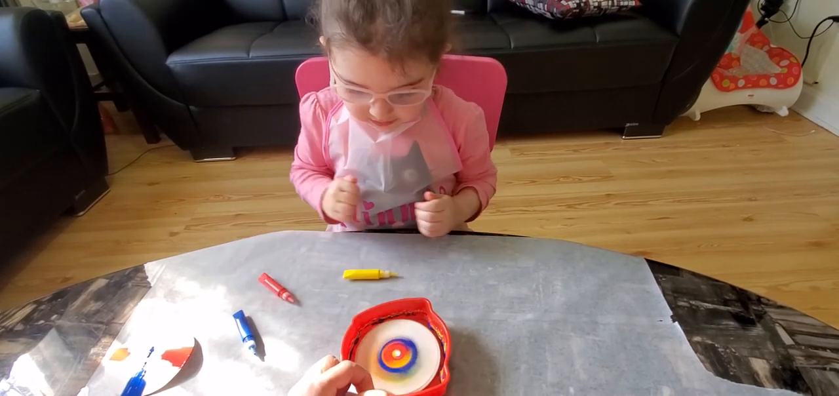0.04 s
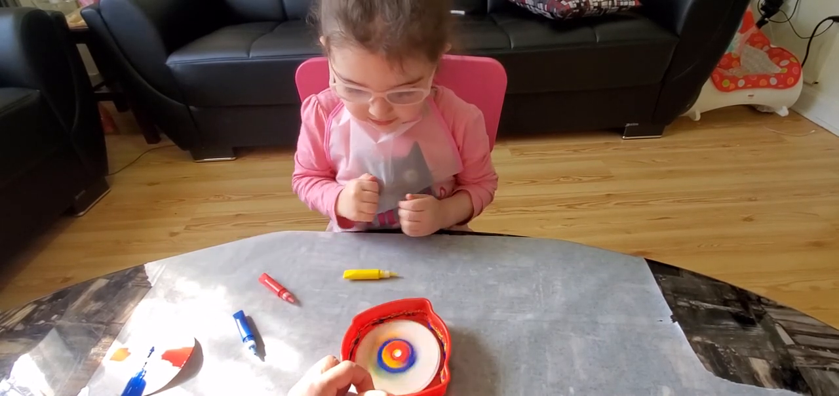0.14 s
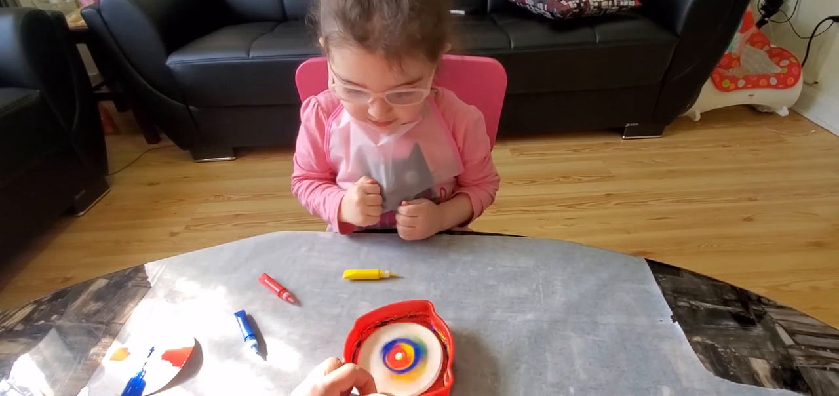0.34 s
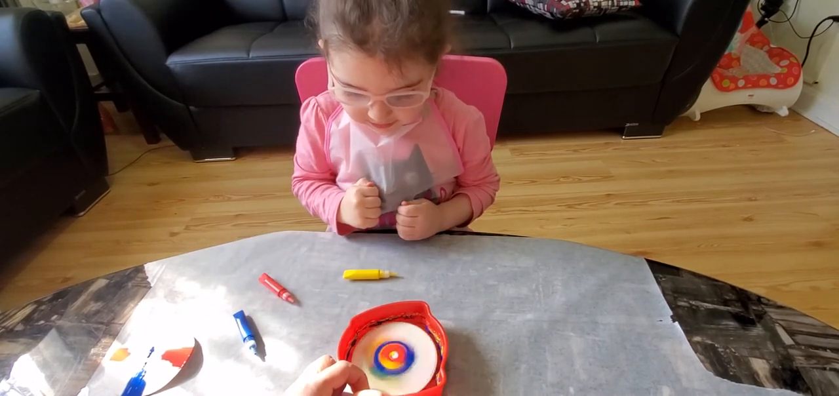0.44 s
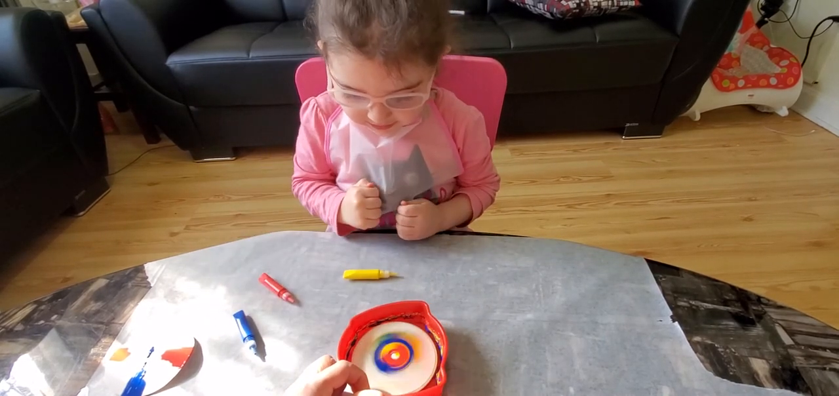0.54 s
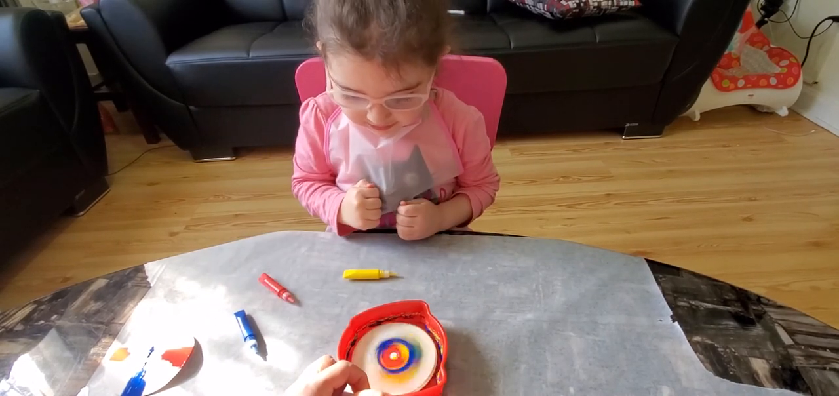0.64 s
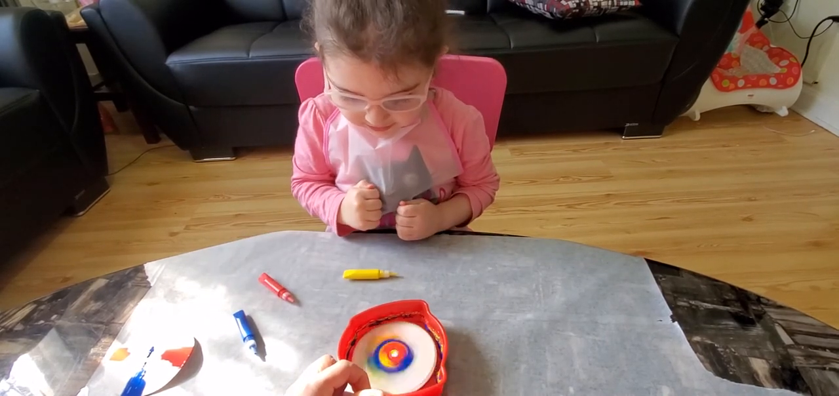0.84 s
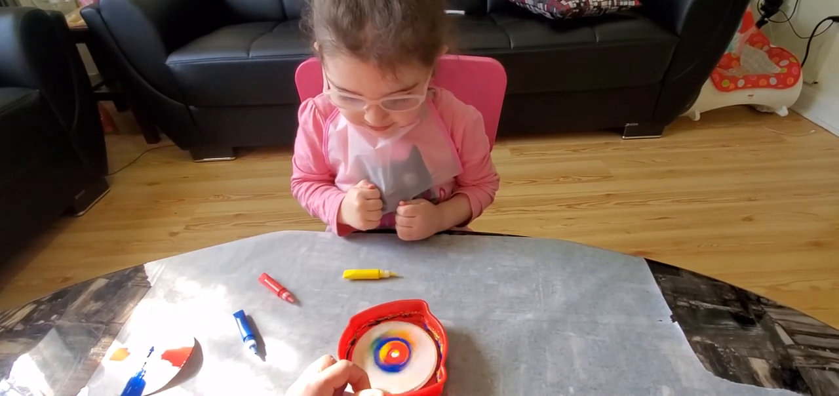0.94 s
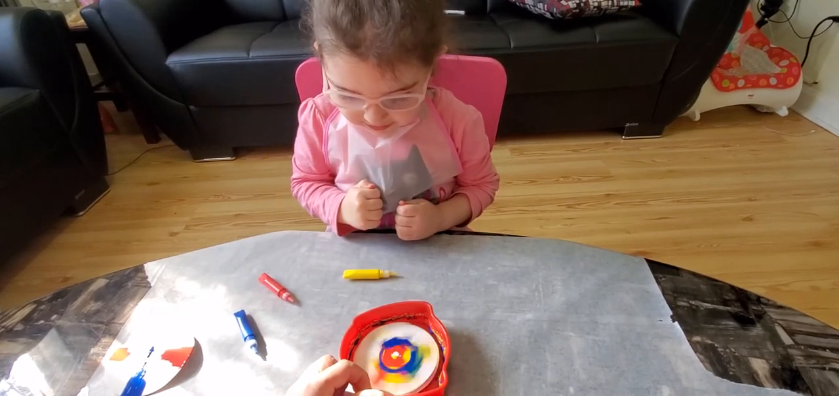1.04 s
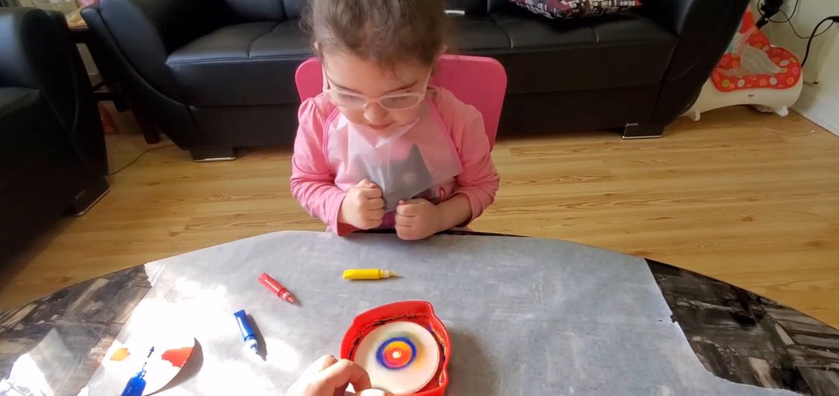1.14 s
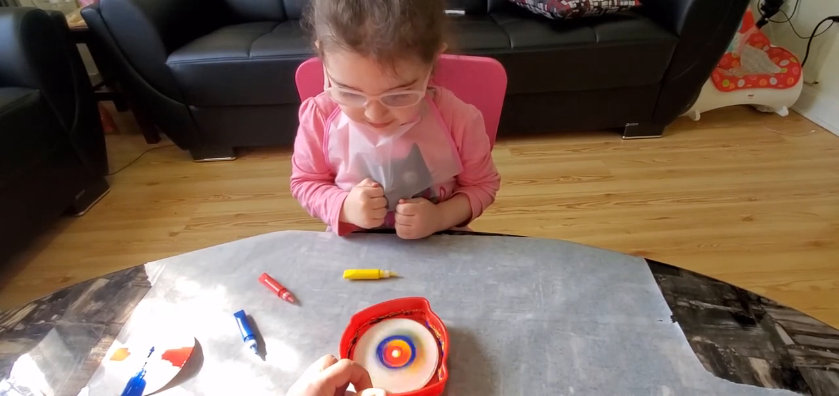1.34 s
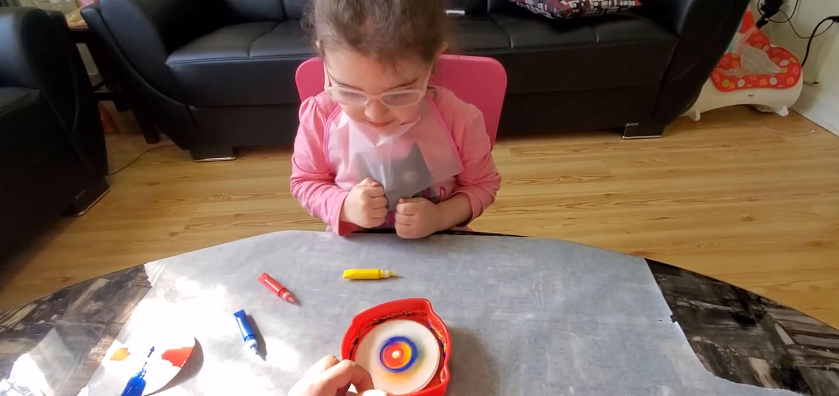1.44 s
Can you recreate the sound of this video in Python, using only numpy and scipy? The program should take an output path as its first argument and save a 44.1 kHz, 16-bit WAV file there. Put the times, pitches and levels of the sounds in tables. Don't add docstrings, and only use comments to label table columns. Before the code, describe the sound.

Close up indoors, hard plastic teeth rattle in a quick burst and snap back, pause with faint whirring and ticking, then rattle again more softly; low table thumps and short room ring accompany each push.

```python
import sys
import numpy as np
from scipy import signal
from scipy.fft import rfft, irfft, next_fast_len
from scipy.io import wavfile
from scipy.ndimage import uniform_filter1d, map_coordinates

SR = 44100
rng = np.random.default_rng(int(sys.argv[2]) if len(sys.argv) > 2 else 0)


def how_loud(loudness_db):
    steps = np.asarray(loudness_db, float) / 20
    return 10 ** steps


def dump(signal):
    limited = np.clip(np.atleast_2d(signal).T, -1, 1)
    pcm = np.round(limited * 32767).astype(np.int16)
    wavfile.write(sys.argv[1], SR, pcm)


N = 66150

# pitch_hz, level_db
ROOM_TONE_COLOUR = [(15, -39), (30, 13), (80, 3.5), (796, -36), (1940, -29), (2910, -24.5), (4610, -6),
                    (10100, -30.5), (15000, -9)]
# time_s, level_db
WHIR_LEVEL = [(0, -54.5), (.18, -55.5), (.55, -61.5), (.66, -51.5), (0.761, -53.5), (.83, -72),
              (0.92, -40.5), (1.25, -57.5), (1.5, -51)]
# pitch_hz, level_db
BEARING_COLOUR = [(180, -52), (300, -20), (624, -2), (900, -4.5), (1900, -4.5), (2840, -10.5),
                  (7820, -12.5), (9090, -25), (16000, -31)]
# pitch_hz, level_db, t60_s
DISC_MODES = [(810, -0.5, 0.11), (1239, 3, 0.026), (1628, 1, 0.04), (1830, -6, .08), (2270, 2, 0.024),
              (3260, -8.5, 0.0037)]
# start_s, peak_db, brightness_db, contact_hz
DISC_TICKS = [(.0044, -36.5, -9, 1950), (.0163, -33, 4, 1870), (.044, -48, -7, 1900), (.0945, -41, 2, 1980),
              (.1132, -35.5, 8, 2670), (.183, -35.5, -9, 2000), (.6247, -42, -27, 1980),
              (.6344, -50, -10, 5500), (.6443, -41, -2, 2280), (.6575, -29.5, -19, 1880),
              (.6688, -32.5, -7, 1970), (.7037, -56, 0, 5500), (.7133, -32.5, -1, 5940),
              (.7244, -28.5, -16, 2100), (.7387, -28.5, -7, 1970), (.8457, -45, -13, 1910),
              (.860, -45, -7, 3500), (.8696, -35.5, -13, 1200), (.9107, -19, -13, 3560),
              (1.2530, -45, -17, 1270), (1.2890, -35, -1, 1520), (1.3135, -32, -5, 1180),
              (1.324, -44, -9, 1200), (1.336, -44, -9, 1100), (1.3630, -32, -6, 1230),
              (1.3919, -39, -3, 1500), (1.4085, -34, -5, 1300), (1.458, -36, -6, 1650),
              (1.4806, -31.5, -8, 1450)]
# start_s, peak_db, brightness_db, contact_hz
TOOTH_CLICKS = [(.2043, -2, -1, 1750), (.2075, -10, -2, 2900), (.2115, -6, 1, 4000), (.2152, -4, 0, 1800),
                (.2196, -4, -1, 3000), (.2242, -2, 1, 1950), (.2297, -4, 1, 5700), (.2352, -4, -2, 1850),
                (.2417, -5, -3, 1850), (.2514, -6, 1, 4800), (.2530, -6, -5, 2000), (.2664, -4, 1, 1800),
                (.2686, -7, -6, 1200), (.9416, -7, -1, 3300), (.9430, -10, -5, 1700), (.9470, -15, 3, 5600),
                (.9524, -9, -1, 5600), (.9584, -7, 0, 5700), (.9655, -8, 2, 2200), (.9739, -6, -6, 1850),
                (.9833, -8, -10, 1800), (.9988, -5, -7, 1800), (1.0008, -11, -13, 1800),
                (1.0098, -16, -9, 2000)]
# start_s, peak_db, brightness_db, contact_hz
RETURN_JOLTS = [(.3327, -5, 1, 3100), (.3346, -7, 1, 5500), (.3363, -3, 1, 3400), (.3385, -8, 2, 1700),
                (.3400, -7, 2, 5300), (.3422, -7, 0, 1650), (.3443, -9, 0, 2600), (.3468, -5, 2, 3700),
                (.3492, -9, 0, 1700), (.3508, -7, 3, 3900), (.3558, -14, 0, 2100), (.3660, -16, -2, 3200),
                (.3690, -15, -2, 3000), (1.0853, -25, -9, 1900), (1.0908, -25, -9, 1800),
                (1.0945, -23, -9, 2000), (1.1035, -23, -9, 2100), (1.1092, -8, -5, 1650),
                (1.1125, -21, -12, 1300), (1.1197, -18, -15, 1900), (1.128, -23, -12, 1300),
                (1.1418, -9, -3, 2000), (1.1434, -10, 0, 3200), (1.1452, -10, 0, 3000),
                (1.1470, -14, 0, 2500), (1.1495, -15, -9, 1400)]
# pitch_hz, level_db, t60_s
SHELL_MODES = [(736, -16, 0.018), (956, -17.5, 0.033), (1195, -5.5, 0.028), (1670, -9, 0.014),
               (1827, -0.5, 0.013), (1905, -3.5, 0.041), (2541, -6.5, 0.064), (2857, -1.5, 0.028),
               (3480, 5, 0.0095), (4240, -3, 0.027), (5750, -8, 0.024), (6716, -5.5, 0.023),
               (7750, 0, 0.0029)]
# pitch_hz, level_db (per Hz)
PLASTIC_COLOUR = [(180, -30), (300, -29.5), (915, -24), (1190, -13.5), (1840, -9.5), (2210, -9.5),
                  (5610, -9.5), (8790, -21), (16000, -27.5)]
# start_s, rise_s, hold_s, level_db, brightness_db
RACK_SCRAPES = [
    (0.196, 0.005, 0.004, -40, -9),
    (0.2040, 0.001, 0.022, -26, 2),
    (.3322, 0.001, 0.019, -23, 4),
    (0.352, 0.002, 0.02, -27, 1),
    (0.87, 0.04, 0.03, -34, -8),
    (1.07, 0.022, 0.045, -30, -15),
    (1.141, 0.0018, 0.0051, -24, 0),
    (0.255, 0.0093, 0.057, -33, -6),
]
# start_s, level_db, rise_s, pitch_hz
LOW_THUMPS = [(0.198, -52, 0.014, 72), (.21, -36, 0.03, 172), (.335, -48, 0.012, 130),
              (0.365, -50, 0.012, 54), (.39, -33, 0.018, 166), (.44, -48, .02, 430), (.89, -38, .02, 147),
              (.94, -51, 0.0092, 66), (0.945, -34, 0.012, 160), (.95, -43, .01, 465),
              (0.955, -38, 0.012, 327), (1.0, -41, .02, 355), (.985, -44, .01, 250),
              (1.09, -46, 0.0084, 500), (1.1, -45, .012, 250), (1.13, -46, 0.016, 430),
              (1.14, -49, .01, 70), (1.144, -36, 0.004, 161), (1.26, -50, .02, 355)]
# pitch_hz, level_db (per Hz)
TABLE_COLOUR = [(60, -16.5), (110, -30), (150, -2.5), (180, -2), (240, -9.5), (340, -10), (500, -10),
                (900, -41)]
# pitch_hz, t60_s
ROOM_DECAY = [(200, 0.89), (1000, 0.41), (3000, 0.44), (8000, 0.32), (14000, 0.33)]
# pitch_hz, left_over_right_db
STEREO_LEAN = [(300, -3.5), (1000, 2), (2100, 5), (3000, -2.5), (6500, -1.5), (8300, 9), (9700, -1),
               (15500, 11)]
# pitch_hz, left_lead_rad
STEREO_LEAD = [(250, 0), (800, 1.4), (3500, 1.6), (5000, 2.8)]
# pitch_hz, likeness_0_to_1
STEREO_LIKENESS = [(3000, .95), (4500, .6), (7000, .2), (15000, .1)]


def unit(x):
    return x / np.sqrt(np.mean(x ** 2) + 1e-20)


def along(points, hz):
    f, value = np.transpose(points)
    return np.interp(np.log(hz + 1), np.log(f + 1), value)


def filtered(x, response):
    size = next_fast_len(x.shape[-1] + 8192)
    spectrum = rfft(x, size) * response(np.fft.rfftfreq(size, 1 / SR))
    return irfft(spectrum, size)[..., :x.shape[-1]]


def causal(points):
    gain = how_loud(along(points, np.fft.rfftfreq(2048, 1 / SR)))
    cepstrum = irfft(np.log(gain + 1e-6))
    cepstrum[1:1024] *= 2
    cepstrum[1025:] = 0
    h = irfft(np.exp(rfft(cepstrum)))[:1024]
    return h / np.linalg.norm(h)


def tilt(x, bright_db):
    treble = signal.lfilter(*signal.butter(1, 2400, "high", fs=SR), x)
    x = x + (how_loud(np.clip(bright_db, -15, 7)) - 1) * treble
    return signal.lfilter(*signal.butter(3, 750, "high", fs=SR), x)


def room_tone():
    mid, side = filtered(rng.standard_normal((2, N)), lambda hz: how_loud(along(ROOM_TONE_COLOUR, hz)))
    side = filtered(side, lambda hz: 0.45 + 0.55 * hz ** 2 / (hz ** 2 + 450 ** 2))
    return how_loud(-64) * np.array([mid + side, mid - side]) / np.std(mid)


def grit(colour, body, ring_db):
    grains_per_s, scatter_db, cap_db, grain_t60_s = 1500, 3, 8, .003
    size = how_loud(np.minimum(scatter_db * rng.exponential(1, N), cap_db))
    size = size * (rng.random(N) < grains_per_s / SR)
    t = np.arange(200) / SR
    grains = np.convolve(size, how_loud(-60 * t / grain_t60_s))[:N] * rng.standard_normal(N)
    grains = unit(grains) + .4 * rng.standard_normal(N)

    def response(f):
        modes = 0
        for hz, db, t60 in body:
            width = 2.2 / t60
            modes = modes + how_loud(db) * 1j * f * width / (hz * hz - f * f + 1j * f * width)
        return 1 + how_loud(ring_db) * modes

    return unit(filtered(np.convolve(grains, causal(colour))[:N], response))


def whir():
    s, db = np.transpose(WHIR_LEVEL)
    t = np.arange(N) / SR
    flutter_db = 2 * map_coordinates(rng.standard_normal(200), [t * 70])
    return how_loud(np.interp(t, s, db) + flutter_db) * tilt(grit(BEARING_COLOUR, DISC_MODES, ring_db=6), 0)


def clicks(rows):
    crack_db, crack_t60_s, contact_s = 11.5, .009, .0003
    mode_scatter_db, detune = 2.5, .012
    favour_db, favour_cycles = 0, 17
    out = np.zeros(N + SR)
    t = np.arange(SR // 20) / SR
    colour = causal(PLASTIC_COLOUR)
    hz, db, t60 = np.transpose(SHELL_MODES)[:, :, None]
    t60 = .85 * np.clip(t60, .008, .035)
    onset = (1 - np.exp(-t / contact_s)) ** 2
    for s, peak_db, bright_db, own_hz in rows:
        level_g, pitch_g = rng.standard_normal((2,) + hz.shape)
        phase = rng.random(hz.shape)
        mode_level = how_loud(db + mode_scatter_db * level_g - 60 * t / t60)
        ring = (mode_level * np.sin(2 * np.pi * (hz * (1 + detune * pitch_g) * t + phase))).sum(0)
        noise = rng.standard_normal(len(t)) * how_loud(crack_db - 60 * t / crack_t60_s)
        crack = np.convolve(noise, colour)[:len(t)]
        hit = tilt((ring + crack) * onset, bright_db)
        own = how_loud(favour_db - 60 * t * own_hz / favour_cycles) * np.sin(2 * np.pi * own_hz * t) * onset
        hit = hit / np.abs(hit).max() + own
        out[round(s * SR):][:len(t)] += how_loud(peak_db) * hit / np.abs(hit).max()
    return out[:N]


def scrapes():
    fall_t60_s = 0.02
    t = np.arange(N) / SR
    rub = grit(PLASTIC_COLOUR, SHELL_MODES, ring_db=-6)
    out = np.zeros(N)
    for s, rise, hold, db, bright_db in RACK_SCRAPES:
        swell = np.clip((t - s) / rise, 0, 1) ** 2
        fall = how_loud(-60 * np.maximum(t - s - rise - hold, 0) / fall_t60_s)
        out += how_loud(db) * swell * fall * tilt(rub, bright_db)
    return out


def toy():
    contacts = clicks(TOOTH_CLICKS) + clicks(RETURN_JOLTS) + clicks(DISC_TICKS)
    return contacts + scrapes() + whir()


def table_hum(shell):
    effort = np.abs(uniform_filter1d(shell ** 2, 1500)) + 1e-7
    rumble = unit(filtered(rng.standard_normal(N), lambda hz: how_loud(along(TABLE_COLOUR, hz))))
    return how_loud(-64) * (effort / 1e-5) ** 0.25 * rumble


def table_thumps():
    t60_s, waver_rad = 0.27, .9
    t = np.arange(N) / SR
    out = np.zeros(N)
    for s, db, rise, hz in LOW_THUMPS:
        late = np.maximum(t - s, 0)
        waver = waver_rad * map_coordinates(rng.standard_normal(300), [t * hz / 5])
        swell = 1 - np.exp(-(late / rise) ** 2)
        out += how_loud(db - 60 * late / t60_s) * swell * np.sin(2 * np.pi * hz * late + waver)
    return out


def room(x):
    near_db, near_t60_s = -7, .012
    room_db, room_gap_s = -5.5, .004
    out, step = np.zeros((2, N + 2 * SR)), SR // 20
    for a in range(0, N, step):
        hz, t, z = signal.stft(rng.standard_normal((2, SR * 3 // 4)), SR, nperseg=256)
        decay = how_loud(-60 * t / along(ROOM_DECAY, hz)[:, None])
        far = signal.istft(z * decay, SR, nperseg=256)[1]
        u = np.arange(far.shape[1]) / SR
        near = rng.standard_normal(far.shape) * how_loud(-60 * u / near_t60_s)
        tail = how_loud(room_db) * far * (u > room_gap_s) / np.linalg.norm(far[0])
        tail = tail + how_loud(near_db) * near / np.linalg.norm(near[0])
        wet = signal.fftconvolve(x[None, a:a + step], tail, axes=1)
        out[:, a:a + wet.shape[1]] += wet
    return out[:, :N]


def scene():
    shared, other = toy(), toy()
    side = np.array([[1], [-1]])

    def turn(hz):
        return np.arccos(along(STEREO_LIKENESS, hz)) / 2

    def microphones(hz):
        level = how_loud(side * along(STEREO_LEAN, hz) / 2)
        return level * np.exp(.5j * side * along(STEREO_LEAD, hz))

    direct = filtered(shared, lambda hz: np.cos(turn(hz)))
    direct = direct + side * filtered(other, lambda hz: np.sin(turn(hz)))
    heard = filtered(direct + room(shared), microphones)
    return heard + table_thumps() + table_hum(shared) + room_tone()


def top_cut(x):
    return signal.sosfilt(signal.butter(12, 16850, fs=SR, output="sos"), x)


def record(dry):
    x = filtered(dry, lambda hz: 1 / (1 + (hz / 15900) ** 70))
    x = x / (1 + np.abs(x / .95) ** 12) ** (1 / 12)
    x = filtered(x, lambda hz: hz ** 2 / (hz ** 2 + 20 ** 2))
    return top_cut(x)


dry = scene()
out = record(dry)
dump(out)
```